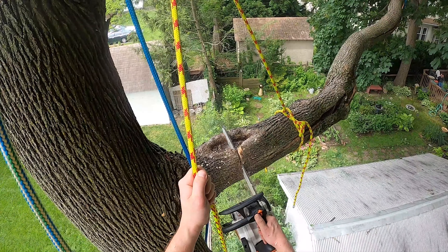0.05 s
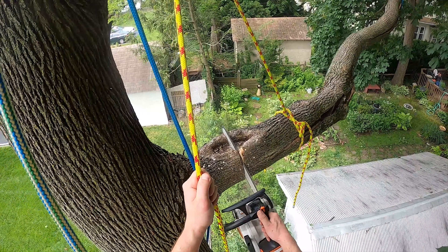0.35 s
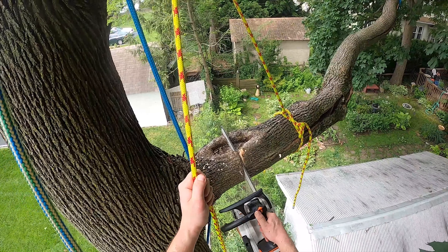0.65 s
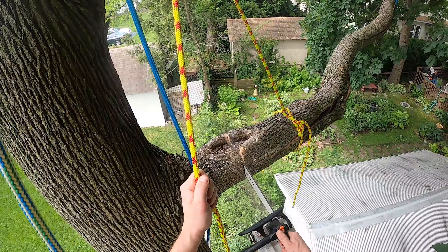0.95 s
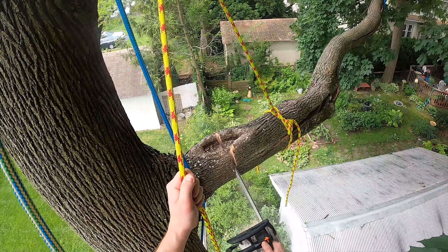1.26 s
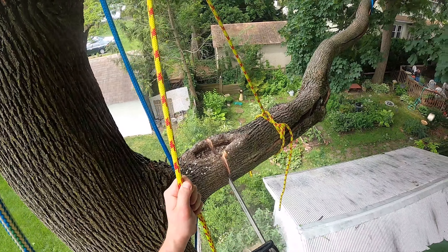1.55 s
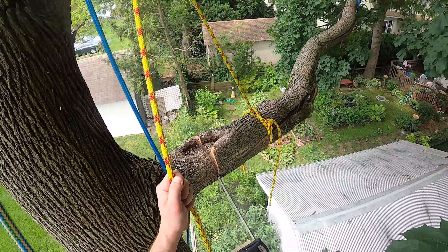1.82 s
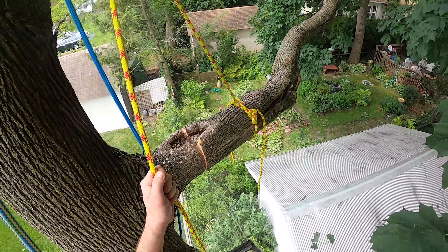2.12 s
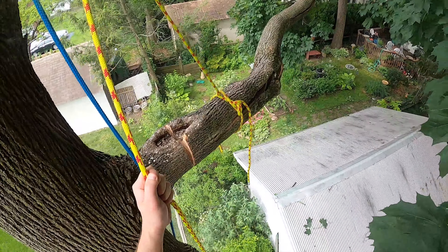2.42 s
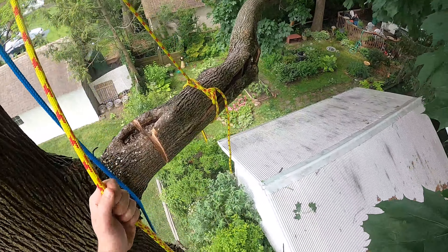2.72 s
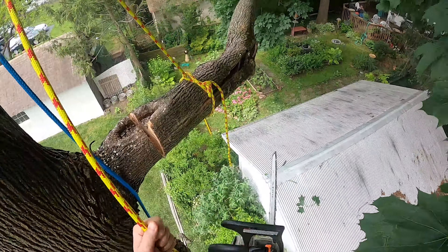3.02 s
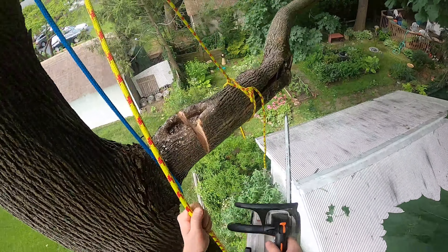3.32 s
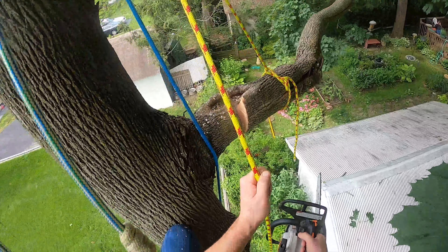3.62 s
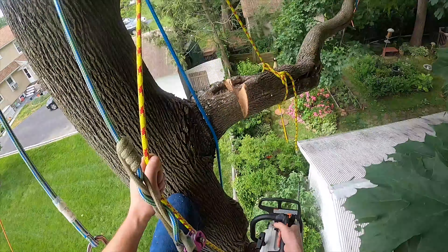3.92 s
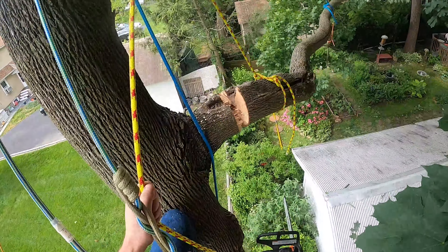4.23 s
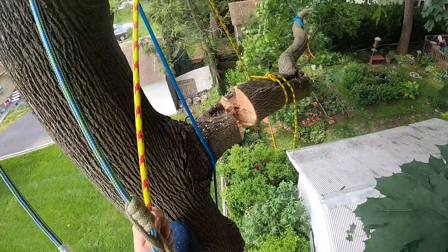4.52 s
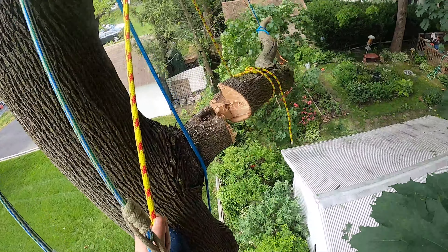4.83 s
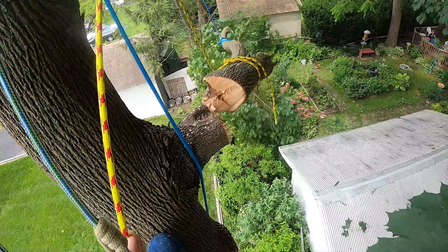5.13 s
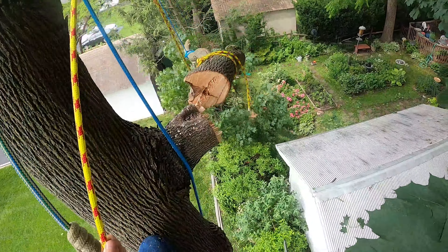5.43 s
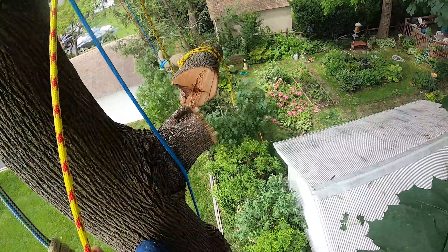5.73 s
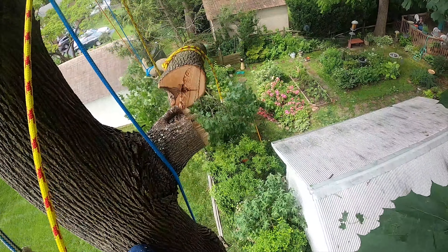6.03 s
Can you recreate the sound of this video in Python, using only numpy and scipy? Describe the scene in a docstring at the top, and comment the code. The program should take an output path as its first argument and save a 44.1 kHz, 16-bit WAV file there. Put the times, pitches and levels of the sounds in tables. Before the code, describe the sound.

A two-stroke chainsaw snarls at full throttle through a tree limb, then winds down and stops with a rattling chain and a few sharp clacks. The limb squeaks, cracks and tears in a quick run of splintering snaps. The cracks thin out as it swings down, swishing through leaves and striking branches further off. The microphone is on the climber's head, close to the saw and wood, above a quiet garden.

```python
"""A two-stroke chainsaw snarls at full throttle high in a tree: firing pulses over a rattling chain.
It finishes the cut, is drawn out and coasts to a stop with a last dull puff, clacking as it is handled.
The limb's hinge wood squeaks, knocks and cracks fibre by fibre, ringing the limb's modes.
The limb swings down on its rope, swishing through leaves and striking branches below.
The microphones sit on the climber's head, over a quiet garden."""
import sys
import numpy as np
from scipy import signal
from scipy.fft import rfft, irfft
from scipy.io import wavfile
from scipy.ndimage import uniform_filter1d

SR = 44100
rng = np.random.default_rng(int(sys.argv[2]) if len(sys.argv) > 2 else 0)


def to_wav(sig):
    """Store sig (one row per channel, or 1-D mono) as 16-bit WAV at the path in sys.argv[1].

    Samples outside -1..1 are clipped; the rate is SR.
    """
    pcm = np.clip(np.atleast_2d(sig), -1, 1) * 32767
    pcm = np.round(pcm).astype(np.int16)
    wavfile.write(sys.argv[1], SR, pcm.T)  # frames by channels


N = 271656
TIME = np.arange(N) / SR
IGNITION_OFF_S, BRAKE_S, STALL_S = 1.74, 2.257, 2.66
CARRY_S = .025  # the flywheel carries on this long after the ignition is cut
GIVES_WAY_S, HANGS_S = 3.714, 4.27  # the hinge gives way; the limb hangs on its rope

# fractures of the hinge wood: (time [s], level [dB], relative body [dB], relative edge [dB])
CRACK_EVENTS = [(3.1473, -16.5, -16.5, -10.5), (3.1576, -14.5, -13, -11.5), (3.168, -13.5, -13, -17),
                (3.2178, -2, -27, -22), (3.2387, -21, -9.5, -11), (3.263, -14.5, -15, -13.5),
                (3.3084, -6.5, -30, -21), (3.3185, -10, -17, -21), (3.329, -16, -14, -14.5),
                (3.358, -17.5, -20, -20), (3.4188, -8, -19.5, -23), (3.4351, -16, -13.5, -21),
                (3.4475, -15, -14, -17), (3.4578, -4, -21.5, -24), (3.467, -22, -13, -20),
                (3.5197, -9, -17.5, -24), (3.5356, -10.5, -10.5, -21), (3.551, -21, -12, -22),
                (3.593, -13, -15, -19), (3.6, -13, -14, -19), (3.6266, -7, -19, -18.5),
                (3.636, -19, -10, -14), (3.6563, -2.5, -11.5, -24.5), (3.7016, -12.5, -14.5, -23),
                (3.751, -16, -12, -22), (3.7643, -10, -17, -18.5), (3.768, -15, -6.5, -22),
                (3.817, -20.5, -9, -15), (3.8452, -12, -12.5, -19.5), (3.9068, -14.5, -12, -19.5),
                (3.963, -22.5, -7, -26), (4.1831, -14.5, -9.5, -18.5), (4.6615, -13, -14, -10),
                (4.6904, -20.5, -13, -11.5), (4.7944, -16.5, -19, -12.5), (4.873, -27.5, -20, -10.5),
                (4.9486, -22, -22, -18.5)]
# normal modes of the limb: (frequency [Hz], level [dB], t60 [s])
LIMB_MODES = [(171.5, -12.5, 0.15), (323, -4, 0.034), (392, -3, 0.069), (495, -8.5, 0.041),
              (670, -2, 0.035), (904, 4, 0.039), (1060, -2.5, 0.012)]
# spectrum of the snap of a blow: (frequency [Hz], spectral density [dB])
SNAP_SPECTRUM = [(600, -18.5), (1100, 9.5), (1600, 12.5), (2000, 12), (2500, 11), (3100, 3.5), (3800, 4.5),
                 (5000, -29)]
# spectrum of the bright edge of breaking wood: (frequency [Hz], spectral density [dB])
WOOD_EDGE = [(2400, -3.5), (3400, 8), (5300, -3.5), (7400, 0), (9600, -8.5), (11200, -20.5), (12700, -5.5),
             (15500, -21)]


def undb(db):
    """Amplitude ratio of a level in decibels."""
    return 10 ** (np.asarray(db) / 20)


def unit(x):
    """Normalisation to rms 1."""
    return x / np.sqrt(np.mean(x ** 2) + 1e-20)


def ramp(start_s, length_s):
    """Raised-cosine transition from 0 to 1."""
    return .5 - .5 * np.cos(np.pi * np.clip((TIME - start_s) / max(length_s, 1e-3), 0, 1))


def since(s):
    """Seconds elapsed since a moment, 0 before it."""
    return np.maximum(TIME - s, 0)


def swell(peak_s, db, rise_db_per_s, fall_db_per_s):
    """Exponential growth to a peak, then exponential decay."""
    return undb(db - rise_db_per_s * np.maximum(peak_s - TIME, 0) - fall_db_per_s * since(peak_s))


def fade(t, t60):
    """Exponential decay, by 60 dB in t60 seconds."""
    return np.exp(-np.log(1000) * t / max(t60, 1e-4))


def walk(rate):
    """Smooth random fluctuation of rms 1, with `rate` new values a second."""
    size = max(int(SR / rate), 1)
    return unit(uniform_filter1d(np.repeat(rng.standard_normal(N // size + 1), size), size)[:N])


def grains(rate, spread_db):
    """Shot noise: on average `rate` clicks a second, of uneven size."""
    clicks = (rng.random(N) < rate / SR) * rng.standard_normal(N)
    return clicks * undb(spread_db * np.clip(rng.standard_normal(N), -2, 2))


def on_bins(points, size, column=1):
    """Log-frequency interpolation of a table column onto FFT bins."""
    table = np.array(points, float)
    return np.interp(np.log(np.fft.rfftfreq(size, 1 / SR) + 1), np.log(table[:, 0]), table[:, column])


def colour(x, points, size=4096):
    """Minimum-phase filter through (frequency [Hz], level [dB]) points, falling beyond the ends."""
    closed = [(points[0][0] / 2, points[0][1] - 20), *points, (points[-1][0] * 2, points[-1][1] - 20)]
    cepstrum = irfft(np.log(undb(on_bins(closed, size))))
    cepstrum[1:size // 2] *= 2
    cepstrum[size // 2 + 1:] = 0
    return signal.fftconvolve(x, irfft(np.exp(rfft(cepstrum))))[:len(x)]


def ring(x, modes):
    """Forced response of damped modes, each (frequency [Hz], level [dB], t60 [s])."""
    t = TIME[:SR // 4]
    response = sum(undb(db) * fade(t, t60) * np.sin(2 * np.pi * hz * t) * (-1) ** k
                   for k, (hz, db, t60) in enumerate(modes))
    return signal.fftconvolve(x, response)[:len(x)]


def at_level(x, db):
    """Normalisation of a transient by the level of its first 10 ms."""
    return x / np.std(x[:SR // 100]) * undb(db)


def add(track, s, sound):
    """Superposition of a sound on a track, starting at s seconds."""
    start = int(s * SR)
    track[start:start + len(sound)] += sound[:N - start]


def shaft_rate(drag_s=.44, friction_hz_per_s=20.5):
    """Rotational inertia: after full throttle, drag and dry friction slow the shaft until it stalls."""
    # engine speed at full throttle: (time [s], firing rate [Hz])
    speed = [(0.02, 158.8), (0.656, 181.3), (0.804, 172.5), (1.05, 184.9), (1.204, 184.2), (1.32, 189),
             (1.536, 186.7), (1.676, 188.8), (1.75, 195.2)]
    driven_hz = np.interp(TIME, *np.transpose(speed))
    friction_hz = friction_hz_per_s * drag_s
    hz = (driven_hz + friction_hz) * np.exp(-since(IGNITION_OFF_S + CARRY_S) / drag_s) - friction_hz
    return np.maximum(hz * (1 - ramp(STALL_S, .12)), 1e-3)


def exhaust(turns, boom, bark, free, jitter_turns=.0036, rough=0.064, sway_db=1.0, rasp_db=-41):
    """Periodic firing gives a harmonic series: a low boom under a bark that changes with the load."""
    # harmonics 1, 2, 3 and up, lugging deep in the wood, cutting cleanly and running free: (level [dB])
    lugging_db = [-18, -25.5, -31, -34, -26, -32, -30, -32.5, -47, -36, -43, -36.5, -37, -39, -30]
    cutting_db = [-17.5, -28.5, -37, -33.5, -22, -32.5, -40, -29.5, -33.5, -35, -38, -27, -32.5]
    free_db = [-18, -31.5, -39.5, -35.5, -23, -28, -35.5, -35, -31.5, -44, -28, -36.5, -35.5, -42, -45, -42,
               -50, -54, -33.5]
    picked_up = ramp(0.1, 0.38)  # the engine climbs into its power band
    loads = (lugging_db, 1 - picked_up), (cutting_db, picked_up - free), (free_db, free)
    phase = 2 * np.pi * (turns + jitter_turns * walk(130))
    uneven_bark = bark * (1 + rough * walk(170))
    sound = 0
    for i in range(len(free_db)):
        gain = sum(share * undb(levels[i]) for levels, share in loads if i < len(levels))
        drive = boom if i < 3 else uneven_bark
        sway = undb(sway_db * walk(5.77)) * (1 + rough * walk(44.5)) if i else 1
        # the muffler smears the low harmonics; the high ones leave together as one sharp pulse
        lag = rng.standard_normal() * (np.pi if i < 6 else .8) if i else 0
        sound = sound + gain * drive * sway * np.sin((i + 1) * phase + lag)
    # above the muffler's resonances a few harmonics stand out
    rasp = sum(np.sin(k * phase + 2 * np.pi * rng.random()) for k in (16, 21, 23))
    return np.sqrt(2) * (sound + undb(rasp_db) * uneven_bark * rasp)


def spit(turns, free, db=-32.5, free_db=-3):
    """Pulsed jet noise: gas spits from the port just after each firing, hardest under load."""
    jet = rng.standard_normal(N) * np.exp(-(turns % 1) / .18)
    return unit(colour(jet, [(900, -5.5), (2100, 1.5), (4200, -14)])) * undb(db + free_db * free)


def chain_levels(hz, free, rattle_knee_hz=64, hiss_knee_hz=101):
    """Impacts weaken as the shaft slows; rattle and hiss rise with slack and drop at the brake."""
    slack, braked = ramp(IGNITION_OFF_S, CARRY_S), ramp(BRAKE_S, 0.018)
    rattle = undb(-28.5 + 0.5 * free + 2.5 * slack - 11.5 * braked)
    hiss = undb(-29 + slack - 5.5 * braked)
    return rattle / np.hypot(1, rattle_knee_hz / hz), hiss / np.hypot(1, (hiss_knee_hz / hz) ** 2)


def chain(turns, free, rattle_gain, hiss_gain, bar_hz=3500, bar_t60=0.0082, sag_hz=110, wander_hz=90):
    """Impact noise of links in their groove; the bar resonates once it is clear of the wood."""
    # spectra of the links' rattle and hiss: (frequency [Hz], spectral density [dB])
    rattle_spectrum = [(60, -42), (250, -7), (600, -5.5), (900, -2), (2100, 3), (2900, -11), (4500, -21)]
    hiss_spectrum = [(2000, -28), (3000, 0.5), (4100, -2), (5300, -12), (6100, -6), (7400, -7),
                     (8200, -17.5), (11000, -26), (13500, -22.5), (15500, -43)]
    shake = 1 + .15 * (np.cos(2 * np.pi * turns) + np.cos(4 * np.pi * turns))  # at both stroke ends
    rattle = unit(colour(grains(7000, 0.97) * shake, rattle_spectrum))
    # the whole bar hisses, so each microphone hears partly different links
    shared, left, right = (unit(colour(grains(9000, 0.85) * shake, hiss_spectrum)) for _ in range(3))
    hiss = unit(shared + np.array([left, right]))
    bar = unit(ring(grains(3000, 1.0) * shake, [(bar_hz, 0, bar_t60)]))
    # the ring wanders with chain tension; with slack it sinks and flares up, then dies away
    slack = ramp(IGNITION_OFF_S, CARRY_S)
    shift_hz = wander_hz * walk(70) - sag_hz * slack
    bar = np.real(signal.hilbert(bar) * np.exp(2j * np.pi * np.cumsum(shift_hz) / SR))
    bar = bar * undb(2.0 * slack) * (1 - ramp(IGNITION_OFF_S, 0.83))
    return rattle_gain * rattle + hiss_gain * (hiss + free * bar)


def chainsaw(boom_fall_db_per_s=124, bark_fall_db_per_s=330, unfired_db=-17, unfired_knee_hz=63):
    """Phase locking: one crankshaft times the exhaust, the pumping and the chain."""
    hz = shaft_rate()
    turns = np.cumsum(hz) / SR
    free = ramp(0.893, 0.17)  # the bar slides out of the cut
    off_s = since(IGNITION_OFF_S)
    unfired_boom = undb(unfired_db) / (1 + (unfired_knee_hz / hz) ** 6)
    boom = np.maximum(undb(-boom_fall_db_per_s * off_s), unfired_boom)
    bark = undb(-bark_fall_db_per_s * off_s)
    engine = exhaust(turns, boom, bark, free) + bark * spit(turns, free) + pumping(turns, hz)
    rattle_gain, hiss_gain = chain_levels(hz, free)
    links = chain(turns, free, rattle_gain, hiss_gain)
    return engine + links + rattle_gain * sprocket(turns, hz) + last_links(turns)


def microphones(x, lean, scatter_db, reflection_s=.0031):
    """Level difference and comb filtering: the treble leans left, and a short reflection adds width."""
    # the pair's response: (frequency [Hz], left minus right [dB], side reflection [dB])
    response = [(192, 3.5, -24.5), (1980, -1.5, -25), (3100, 14.5, -9), (4450, 4, -15.5), (10500, 25, 7),
                (13300, 45, 16.5)]
    balance = np.tanh(lean * on_bins(response, N) * np.log(10) / 40)
    delay = np.exp(-2j * np.pi * np.fft.rfftfreq(N, 1 / SR) * reflection_s)
    reflection = undb(on_bins(response, N, column=2) + scatter_db) * delay
    side = balance + (1 - balance) * reflection
    return irfft(rfft(x) * np.array([1 + side, 1 - side]), N)


def echoes(x, wet_db=-21.5, t60=0.5, build_s=0.055):
    """Diffuse reflection: roofs and trees send back a faint, dull wash."""
    t = TIME[:SR]
    envelope = fade(t, t60) * (1 - np.exp(-t / build_s))
    spectrum = [(150, -10), (2200, -1), (6500, -2), (12000, -26)]
    responses = [colour(rng.standard_normal(SR) * envelope, spectrum) for _ in range(2)]
    return undb(wet_db) * np.array([signal.fftconvolve(x, r / np.linalg.norm(r))[:N] for r in responses])


def garden(air_db=-49, side_db=-10, breeze_db=6):
    """Ambient noise: open air and a low rumble, growing as a breeze picks up."""
    # spectrum of the open air: (frequency [Hz], spectral density [dB])
    air_spectrum = [(25, -2), (115, 5), (220, -5.5), (700, -12.5), (2200, -11), (7000, -26.5), (15000, -40)]
    mid, side = (unit(colour(rng.standard_normal(N), air_spectrum)) for _ in range(2))
    gain = undb(air_db + breeze_db * ramp(3.65, 1.93) + walk(4.0))
    return gain * (mid + undb(side_db) * side * np.array([[1], [-1]]))


def pumping(turns, shaft_hz, start_hz=520, end_hz=110, sweep_s=0.0038, length_s=0.015):
    """Air displacement: each unfired stroke puffs through the muffler, harder at speed."""
    t = TIME[:int(length_s * SR)]
    hz = end_hz + (start_hz - end_hz) * np.exp(-t / sweep_s)  # the pitch falls as the port opens
    puff = np.sin(2 * np.pi * np.cumsum(hz) / SR) * np.sin(np.pi * np.sqrt(t / length_s)) ** 2
    window = np.hanning(len(t))
    puff = puff - window * puff.sum() / window.sum()  # zero mean pressure
    strokes = np.diff(np.floor(turns), prepend=0) * ramp(IGNITION_OFF_S, CARRY_S) * (TIME < STALL_S)
    push = undb(-32 + 12 * (shaft_hz / shaft_hz.max()) ** 2)
    return signal.fftconvolve(strokes * push, puff)[:N]


def sprocket(turns, hz, gain_db=0.5, speed_power=0.52):
    """Meshing tones: teeth and chain whine at multiples of the shaft rate as the engine coasts."""
    whine = sum((1 + .6 * walk(40)) * np.sin(2 * np.pi * (k * turns + rng.random()))
                for k in range(5, 14))
    # the small cover radiates no bass
    radiated = colour(unit(whine), [(400, -4.5), (700, -6), (1000, 1.5), (2300, -6.5)])
    return radiated * ramp(IGNITION_OFF_S, 0.043) * (hz / hz.max()) ** speed_power * undb(gain_db)


def blows(events, modes, edge_spectrum, spray, spray_t60, tail_db, tail_t60, shudder_db,
          snap_db, body_db, edge_db, knock_hz=2050, knock_t60=0.0063, knock_db=-5):
    """Impulse excitation: a pulse and a spray of smaller ones give a snap, a body ring and an edge."""
    track, t = np.zeros(N), TIME[:SR // 4]
    for s, db, body_offset, edge_offset in events:
        pulses, wash = rng.standard_normal((2, len(t)))
        push = spray * pulses * np.abs(pulses) * fade(t, spray_t60)
        push[0] += 1
        tail = wash * fade(t, tail_t60)
        ragged = push + undb(tail_db) * tail
        # each blow lands at a new spot: the modes vary a little and the knock has its own pitch
        struck = [(hz * (1 + .015 * rng.standard_normal()), mode_db + 2 * rng.standard_normal(), t60)
                  for hz, mode_db, t60 in modes]
        knock = ring(push, [(knock_hz * (1 + 0.1 * rng.standard_normal()), 0, knock_t60)])
        snap = at_level(unit(colour(ragged, SNAP_SPECTRUM)) + undb(knock_db) * unit(knock), snap_db)
        body = at_level(ring(push + undb(shudder_db) * tail, struck), body_db + body_offset)
        edge = at_level(colour((push + ragged) / 2, edge_spectrum), edge_db + edge_offset)
        add(track, s, undb(db) * (snap + body + edge))
    return track


def clacks_and_puff():
    """Modal response: knocks on the saw, and the engine's last dull puff, ring the housing."""
    # knocks and the last puff: (time [s], level [dB], relative body [dB], relative edge [dB])
    events = [(2.245, -23, -30, -2.5), (2.2569, -7, -15, -13.5), (2.386, -12, -23, -10.5),
              (2.5687, -17.5, -24.5, -5), (2.6803, -15.5, -22.5, -12.5), (2.7325, -28, -11.5, -51),
              (2.8257, -4.5, -18, -16), (2.8774, -10.5, -17, -8.5), (2.9572, -5, -22.5, -15),
              (2.9838, -12, -19.5, -11), (3.0035, -20, -16.5, -9), (3.0693, -24, -16, -7.5)]
    # normal modes of the housing: (frequency [Hz], level [dB], t60 [s])
    housing_modes = [(177, -1.5, 0.047), (398, -2.5, 0.063), (667, -4, 0.033), (962, 0, 0.027)]
    # spectrum of a knock's bright edge: (frequency [Hz], spectral density [dB])
    edge_spectrum = [(2600, -4), (3600, 5), (5000, -4.5), (7400, 3.5), (9000, -9.5), (11500, -17.5),
                     (15500, -28)]
    return blows(events, housing_modes, edge_spectrum, spray=0.16, spray_t60=0.013, tail_db=-28.5,
                 tail_t60=0.17, shudder_db=-26, snap_db=-14.0, body_db=2.0, edge_db=-4.5)


def last_links(turns, t60=0.017):
    """Amplitude modulation: on the last slow turns the chain chatters in one spurt a turn."""
    spurts = grains(4400, 1.1) * np.sin(np.pi * turns) ** 4
    chatter = unit(ring(spurts, [(1950, 0, t60), (820, -5, t60)]))
    return chatter * ramp(BRAKE_S, 0.024) * swell(2.477, -32.5, rise_db_per_s=25, fall_db_per_s=110)


def squeaks_and_knocks(t60=0.0066):
    """Resonance: brief noise bursts each drive one mode, giving short pitched squeaks and knocks."""
    # squeaks and knocks of wood: (time [s], level [dB], pitch [Hz], length [s])
    events = [(2.814, -27.5, 2550, 0.02), (3.201, -31.5, 2640, 0.023), (4.207, -30.5, 2520, 0.0073),
              (4.756, -32.5, 2280, 0.0041), (5.108, -24.5, 2040, 0.0048)]
    track, t = np.zeros(N), TIME[:SR // 20]
    for s, db, hz, length_s in events:
        burst = rng.standard_normal(len(t)) * np.sin(np.pi * np.minimum(t / length_s, 1))
        mode = [(hz, 0, t60)]
        add(track, s, at_level(ring(ring(burst, mode), mode), db))
    return track


def jolts(hz=75, t60=0.025, rumble_db=-30.5, rumble_t60=0.49):
    """Pressure transients: air thumps each microphone, and a rumble lingers in their mount."""
    # jolts of air: (time [s], left level [dB], right level [dB])
    air_jolts = [(2.829, -7.5, -11), (2.962, -34, -2.5), (3.22, -30, -12)]
    left, right, t = np.zeros(N), np.zeros(N), TIME[:SR // 2]
    thump = np.sin(2 * np.pi * hz * t) * fade(t, t60)
    for s, left_db, right_db in air_jolts:
        noise = colour(rng.standard_normal(len(t)), [(60, -14), (150, -2), (260, -14), (700, -36)])
        rumble = unit(noise) * fade(t, rumble_t60) * undb(rumble_db)
        add(left, s, thump * undb(left_db) + rumble)
        add(right, s, thump * undb(right_db) + rumble)
    return np.array([left, right])


def cracks():
    """Brittle fracture: each break in the hinge wood is an impulse that rings the limb."""
    return blows(CRACK_EVENTS, LIMB_MODES, WOOD_EDGE, spray=0.043, spray_t60=0.03, tail_db=-28,
                 tail_t60=0.11, shudder_db=-30, snap_db=-13.5, body_db=-1.5, edge_db=-4.0)


def tearing(bunch_db=3.5, wood_db=-2, edge_db=-11, hanging_db=-15.5):
    """Acoustic emission: fine fibres fail in bunches, most strongly as the hinge gives way."""
    fibres = grains(900, 2.8) * undb(bunch_db * np.clip(walk(70), -2, 2))
    snap = unit(colour(fibres, SNAP_SPECTRUM))
    wood = undb(wood_db) * unit(ring(fibres, LIMB_MODES))
    edge = undb(edge_db) * unit(colour(fibres, WOOD_EDGE))
    strain = swell(GIVES_WAY_S, -35, rise_db_per_s=28, fall_db_per_s=15)
    relief = undb(hanging_db * ramp(HANGS_S, 0.049))
    return unit(snap + wood + edge) * strain * relief * ramp(CRACK_EVENTS[0][0], 0.029)


def narrowing(x, start_s=3.38, length_s=0.19):
    """Mid-side attenuation: the stereo image closes to the middle, all but its highest treble."""
    # remaining width: (frequency [Hz], side gain [dB])
    width = [(2500, -31.5), (6000, -20.5), (13000, -2)]
    mid, side = x.mean(axis=0), (x[0] - x[1]) / 2
    narrow = irfft(rfft(side) * undb(on_bins(width, N)), N)
    side = side + ramp(start_s, length_s) * (narrow - side)
    return mid + side * np.array([[1], [-1]])


def small_snaps(t60=0.037, snap_db=1, edge_db=-4):
    """Broadband fracture noise: small, short snaps of the hinge wood."""
    # snaps of the hinge wood: (time [s], level [dB])
    events = [(3.431, -31), (3.5596, -36), (3.604, -29.5), (4.035, -52), (4.072, -46), (4.095, -50),
              (4.152, -42), (4.2342, -35), (4.246, -35.5), (4.271, -43), (4.342, -39), (4.4172, -45),
              (4.424, -41), (4.456, -42), (4.53, -46)]
    track, t = np.zeros(N), TIME[:SR // 10]
    for s, db in events:
        burst = rng.standard_normal(len(t)) * fade(t, t60)
        snap = undb(snap_db) * unit(colour(burst, SNAP_SPECTRUM))
        edge = undb(edge_db) * unit(colour(np.diff(burst, prepend=0), WOOD_EDGE))
        add(track, s, at_level(snap + edge, db))
    return track


def foliage(flutter_db=-1.5):
    """Incoherent summation: countless leaf contacts merge into a swish with crisp ticks on top."""
    # spectrum of brushing leaves: (frequency [Hz], spectral density [dB])
    swish_spectrum = [(200, -15.5), (700, -5), (1600, -1), (2500, -2), (3200, -15), (5000, -15)]
    tick_spectrum = [(2500, -10), (4000, 2.5), (7000, -6), (13000, -19)]
    swish = unit(colour(grains(9000, 1), swish_spectrum)) * undb(flutter_db * walk(25))
    ticks = np.array([unit(colour(grains(4000, 2.4), tick_spectrum)) for _ in range(2)])
    swish = swish * swell(5.78, -40, rise_db_per_s=6.5, fall_db_per_s=94)
    ticks = ticks * swell(5.75, -40.5, rise_db_per_s=117, fall_db_per_s=95)
    return ramp(HANGS_S, 0.91) * (swish + ticks)


def strikes(crack_t60=0.076, tail_t60=0.36, tail_db=-14, gain_db=-7.0):
    """Scattering: branches snap further off, dulled and smeared by the trees around them."""
    # the limb striking branches below: (time [s], relative level [dB])
    hits = [(5.601, -23), (5.664, -19.5), (5.736, -13)]
    spectrum = [(350, -8.0), (700, -2.5), (2200, 4.5), (3200, -4.0), (13000, -30.5)]
    track, t = np.zeros(N), TIME[:SR // 3]
    envelope = fade(t, crack_t60) + undb(tail_db) * fade(t, tail_t60)
    for s, db in hits:
        burst = unit(colour(rng.standard_normal(len(t)), spectrum))
        add(track, s, burst * undb(db + gain_db) * envelope)
    return track


def scene():
    """Superposition of saw and limb within arm's reach and the falling crown further off."""
    saw = microphones(chainsaw(), lean=0.77, scatter_db=3.5)
    housing = microphones(clacks_and_puff(), lean=1.0, scatter_db=12.0)
    wood = cracks() + tearing() + small_snaps() + squeaks_and_knocks()
    near = saw + housing + microphones(wood, lean=0.72, scatter_db=5.5)
    return narrowing(near + echoes(near.mean(axis=0)) + jolts() + garden()) + foliage() + strikes()


def record(dry):
    """Hard clipping at full scale, then band limiting at 16 kHz."""
    lowpass = signal.ellip(8, .2, 70, 16000, fs=SR, output="sos")
    return signal.sosfilt(lowpass, np.clip(dry, -1, 1))


dry = scene()
out = record(dry)
to_wav(out)
```